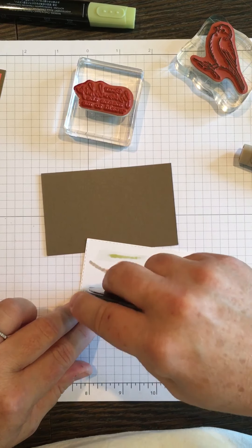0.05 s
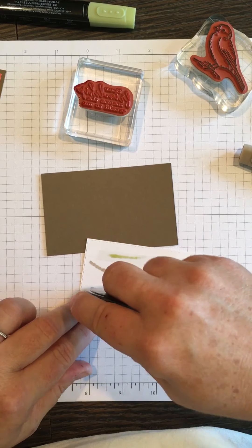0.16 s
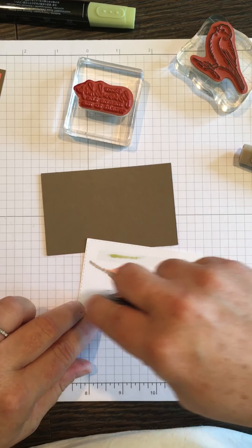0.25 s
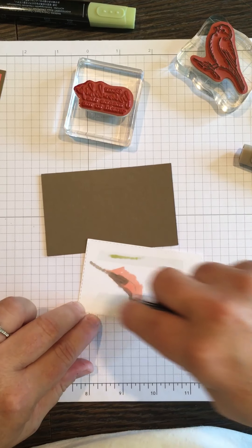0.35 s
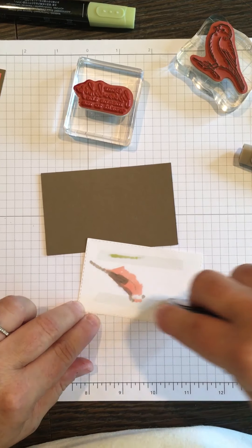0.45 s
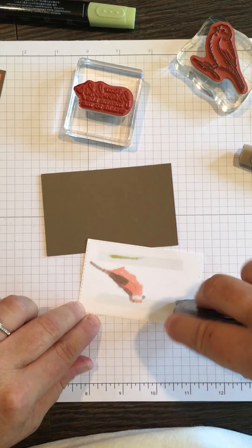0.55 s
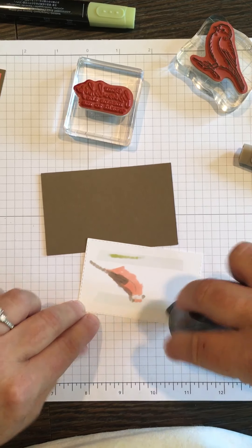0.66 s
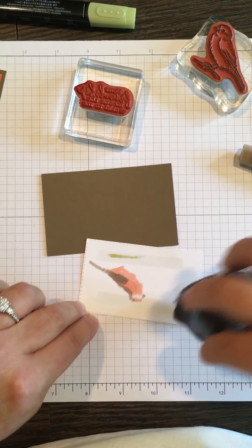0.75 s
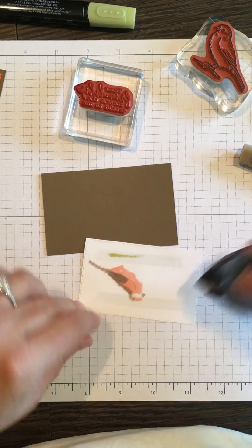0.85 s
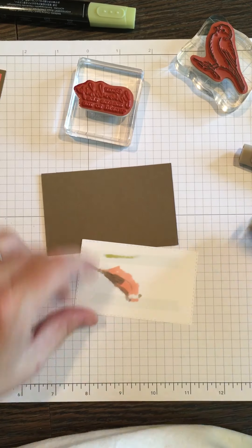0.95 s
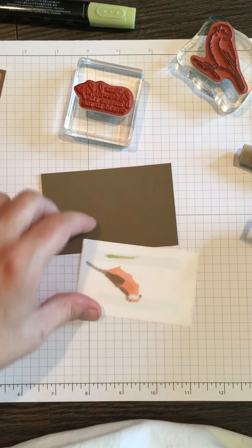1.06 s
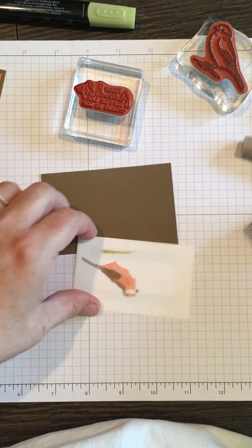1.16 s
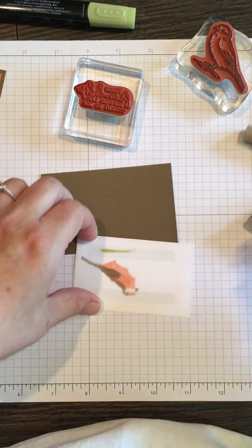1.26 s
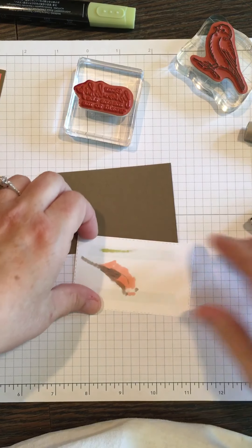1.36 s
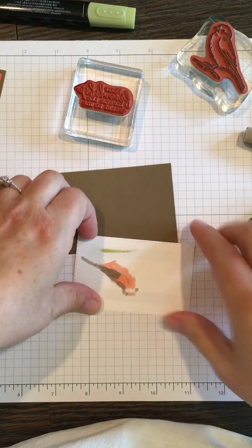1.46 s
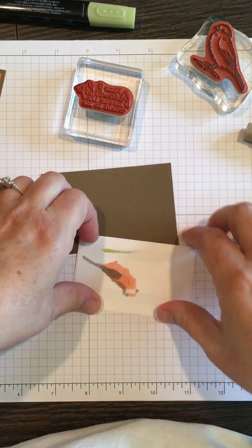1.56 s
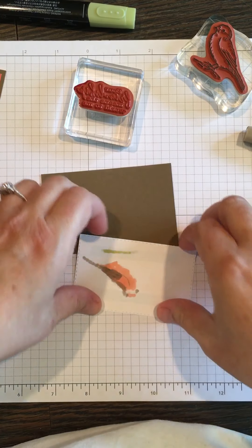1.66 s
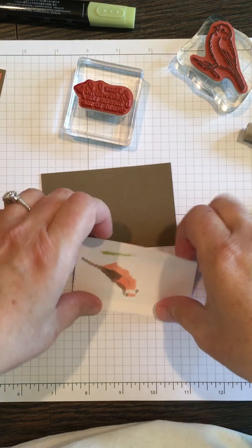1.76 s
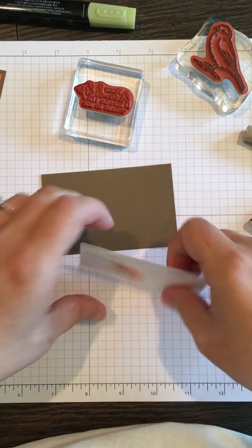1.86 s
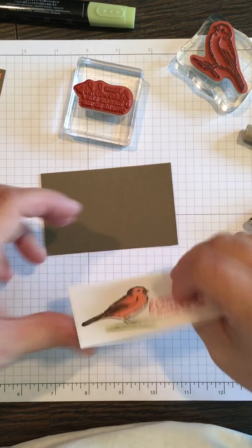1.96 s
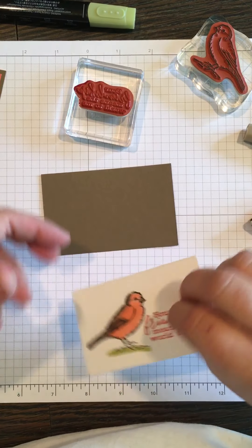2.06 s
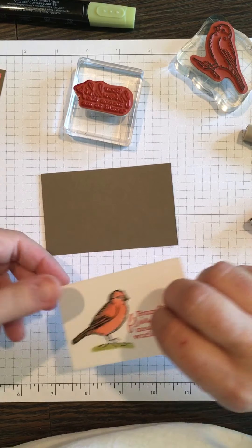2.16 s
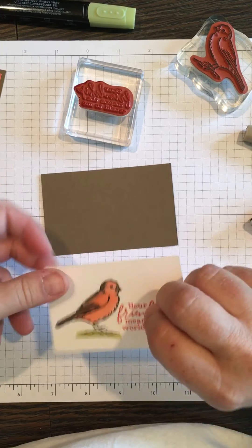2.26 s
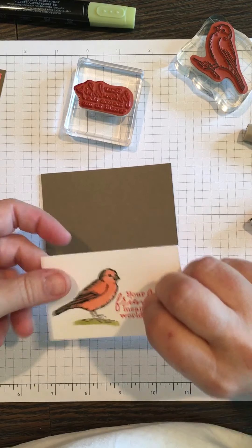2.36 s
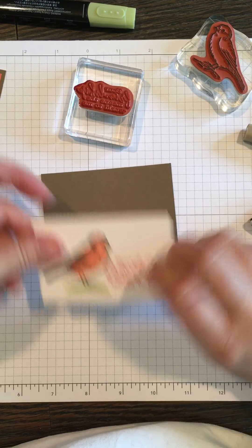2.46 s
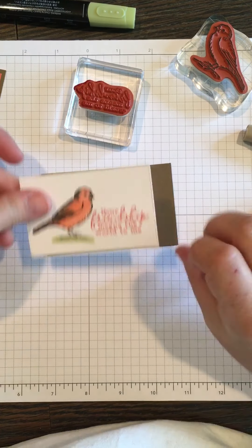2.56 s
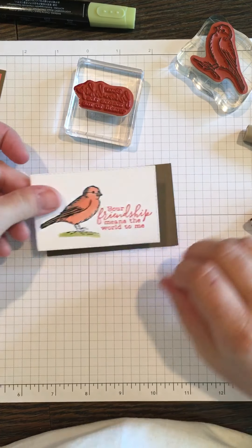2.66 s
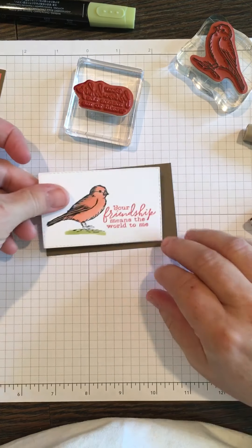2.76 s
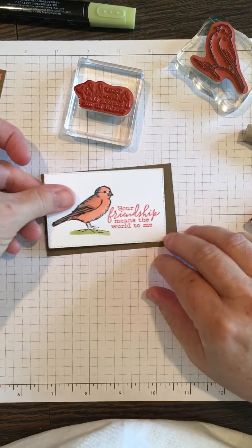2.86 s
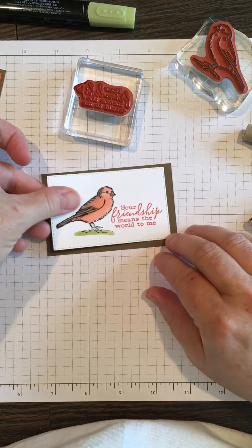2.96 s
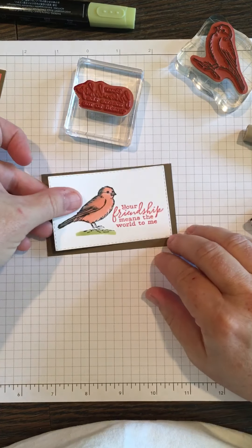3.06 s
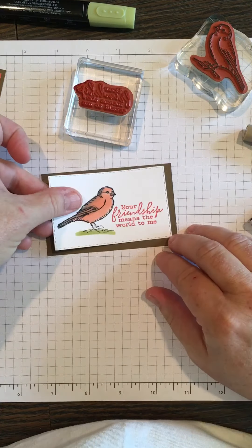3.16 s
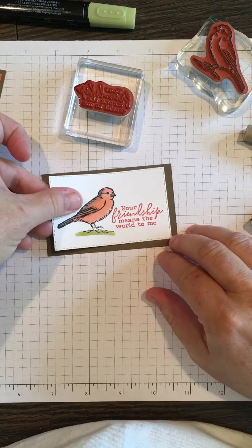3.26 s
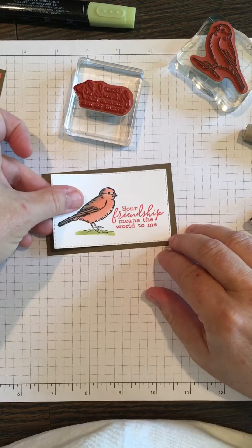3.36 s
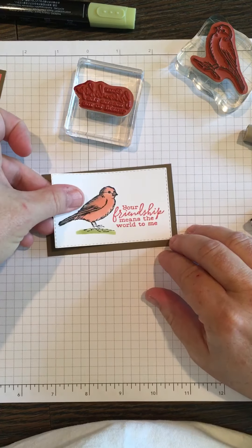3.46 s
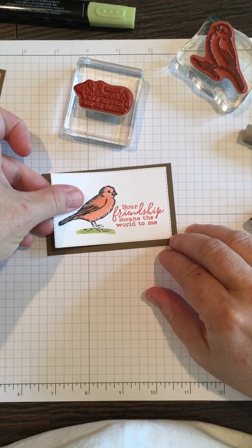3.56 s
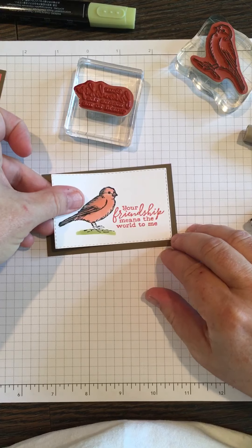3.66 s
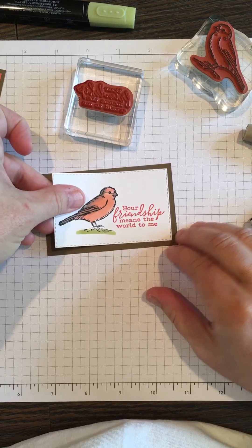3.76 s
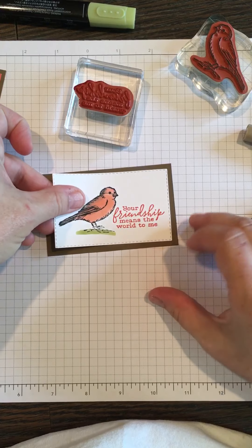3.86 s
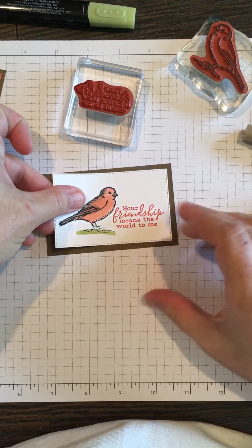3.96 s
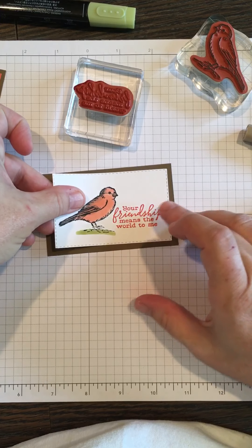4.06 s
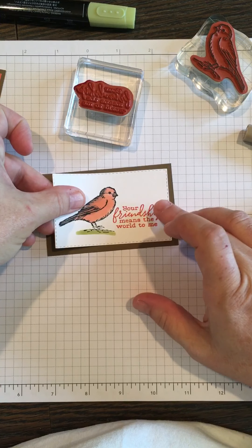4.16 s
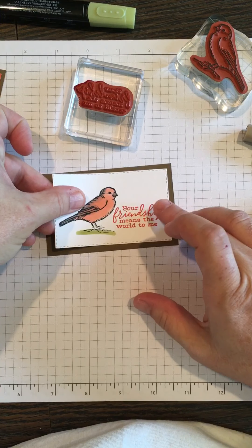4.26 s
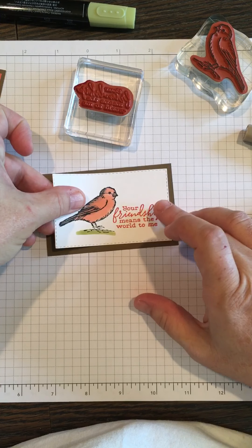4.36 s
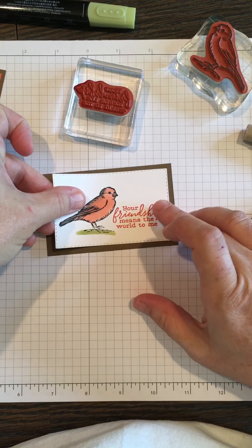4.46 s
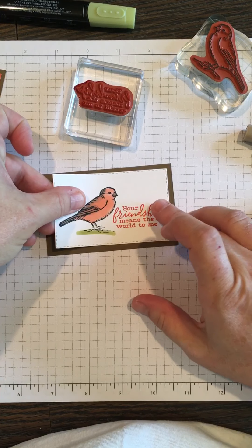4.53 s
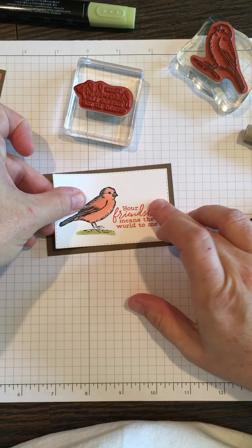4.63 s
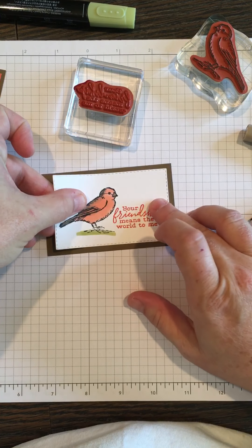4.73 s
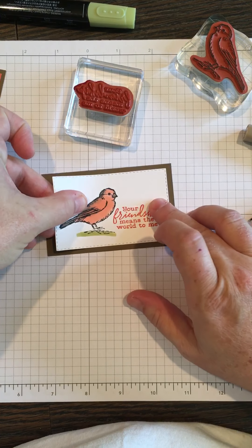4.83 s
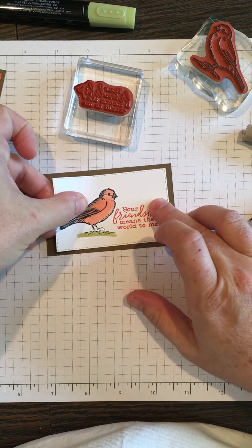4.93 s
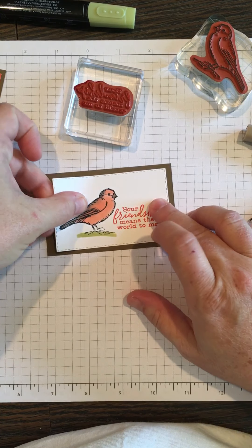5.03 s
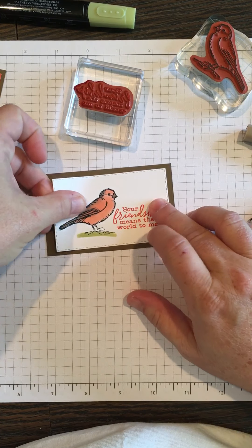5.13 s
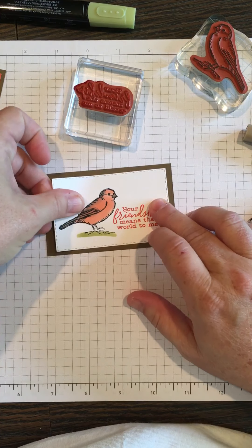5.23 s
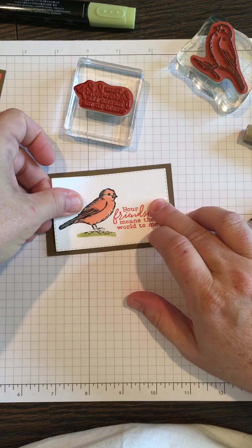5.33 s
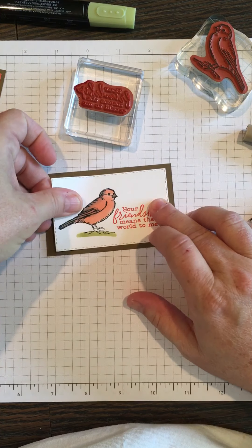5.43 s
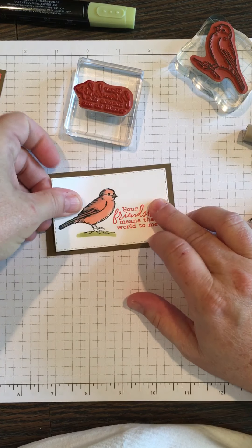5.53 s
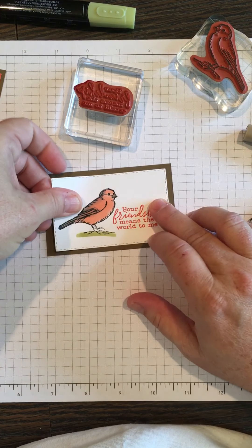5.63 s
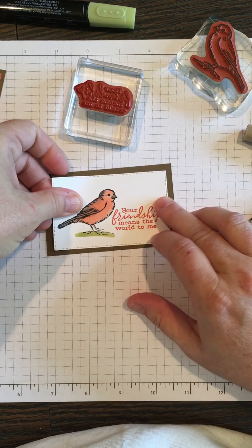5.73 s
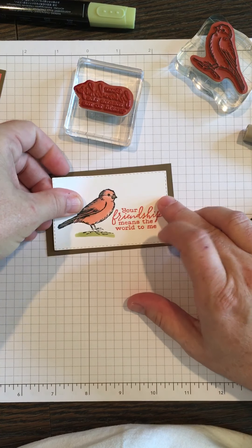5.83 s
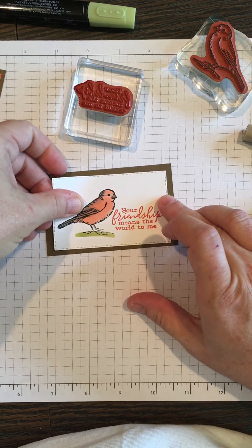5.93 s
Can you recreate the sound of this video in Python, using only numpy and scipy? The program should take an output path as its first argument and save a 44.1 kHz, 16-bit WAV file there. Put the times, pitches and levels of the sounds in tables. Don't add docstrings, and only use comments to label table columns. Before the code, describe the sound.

An adhesive tape runner whirrs briefly across card, is put down with a hard rattle, then paper softly brushes and ticks until near silence.

```python
import sys
import numpy as np
from scipy import signal
from scipy.fft import rfft, irfft, next_fast_len
from scipy.io import wavfile
from scipy.ndimage import uniform_filter1d, map_coordinates

SR = 44100
rng = np.random.default_rng(int(sys.argv[2]) if len(sys.argv) > 2 else 0)


def to_linear_factor(level_db):
    exponent = np.asarray(level_db, float) / 20
    return 10 ** exponent


def store_pcm(level_fs):
    pcm = np.round(np.clip(level_fs, -1, 1) * 32767).astype(np.int16)
    wavfile.write(sys.argv[1], SR, np.atleast_2d(pcm).T)


N = 264159

# [f/Hz, width/Hz, level/dB]
CASE = [(1390, 140, 0), (3130, 290, 1), (4500, 500, -12.5), (6730, 300, -7)]
# [t/s, teeth passed]
TRAVEL = [
    (.3245, 0),
    (.3439, 1),
    (.3582, 2),
    (.4169, 8),
    (.4995, 19),
    (.5405, 24),
    (.5684, 27),
    (.6238, 31),
    (.6363, 32),
]
# [f/Hz, level/dB]
HISS = [(2350, -25), (4000, -13.5), (5000, -11), (6570, -5.5), (7690, -2), (15100, 3), (16100, 2.5),
        (17000, -87.5)]
# [t/s, rubbing level/dB, weight on the table level/dB]
HANDS = [(0, -74.5, -58.5), (.18, -75.5, -52.5), (.29, -71.5, -57.5), (.66, -62.5, -55), (.96, -62, -55),
         (1.1, -67.5, -55.5), (1.18, -54, -45.5), (1.28, -53, -47.5), (1.43, -61.5, -54),
         (1.84, -62, -57.5), (2.18, -69.5, -59.5), (2.5, -65, -59), (2.8, -69, -60), (3.7, -73, -61),
         (4.41, -75.5, -61.5), (4.85, -73, -60), (5.0, -73, -59), (5.99, -70, -61)]


def unit(x):
    return x / np.sqrt(np.mean(x ** 2) + 1e-20)


def along(points, hz):
    f, v = np.transpose(points)
    return np.interp(np.log(hz + 1), np.log(f + 1), v)


def curves(rows):
    s, *cols = np.transpose(rows)
    return [np.interp(np.arange(N) / SR, s, c) for c in cols]


def wobble(rate):
    knots = rng.standard_normal(int(N * rate / SR) + 4)
    return map_coordinates(knots, [np.arange(N) * rate / SR])


def filtered(x, response):
    m = next_fast_len(len(x) + 4096)
    return irfft(rfft(x, m) * response(np.fft.rfftfreq(m, 1 / SR)), m)[:len(x)]


def coloured(x, spectrum):
    return filtered(x, lambda hz: to_linear_factor(along(spectrum, hz)))


def ringing(x, modes):
    def response(f):
        total = 0
        for k, (centre, width, db) in enumerate(modes):
            mode = 1j * f * width / (centre * centre - f * f + 1j * f * width)
            total = total + (-1) ** k * to_linear_factor(db) * mode
        return total
    return filtered(x, response)


def burst(spread_ms):
    u = np.arange(SR // 20) / SR / (max(spread_ms, .2) / 1000)
    return u ** 1.41 * np.exp(-1.4 * u) * rng.standard_normal(len(u))


def add(track, s, sound, db):
    part = track[round(s * SR):][:len(sound)]
    part += to_linear_factor(db) * sound[:len(part)] / np.abs(sound).max()


def grainy(rate, spread_db, bed):
    hit = rng.random(N) < rate / SR
    sparks = hit * rng.standard_normal(N) * to_linear_factor(spread_db * rng.exponential(1, N))
    return unit(sparks) + bed * rng.standard_normal(N)


def ratchet():
    # [f/Hz, level/dB]
    snap = [(2940, -39), (5000, -6), (6660, -17.5), (7650, -14), (10500, -9.5), (12100, -8), (15300, -3),
            (16200, -20.5), (17000, -72)]
    # [t/s, pawl force level/dB, grip that frees the shell's low ring level/dB]
    pull = [
        (.324, -25.5, -18),
        (.346, -29, -4),
        (.37, -25, -8.5),
        (.41, -29.5, -4.5),
        (.453, -35, -10),
        (.495, -30, -10.5),
        (.53, -29.5, -10),
        (.56, -29, -11.5),
        (.626, -27, -13.5),
    ]
    snap_db, last_tooth_db = 5.5, -14.5
    scatter_db, jitter_ms = 2, .5
    out = np.zeros(N)
    when, teeth = np.transpose(TRAVEL)
    chance = rng.standard_normal((int(teeth[-1]) + 1, 4))
    times = np.interp(np.arange(len(chance)), teeth, when) + jitter_ms / 1000 * chance[:, 3]
    force_db, grip_db = curves(pull)
    for s, luck_db in zip(times, scatter_db * chance[:, :3]):
        at = round(s * SR)
        high_db = force_db[at] + last_tooth_db * (s > when[-2:].mean())
        low_ring = ringing(burst(.9), CASE[:1])
        high_rings = ringing(burst(1.5), CASE[1:])
        crack = coloured(burst(1.35), snap)
        levels_db = luck_db + [high_db + grip_db[at], high_db, high_db + snap_db]
        for sound, db in zip([low_ring, high_rings, crack], levels_db):
            loudest = np.sqrt(uniform_filter1d(sound ** 2, size=60).max())
            out[round((s - .0006) * SR):][:len(sound)] += to_linear_factor(db) * sound / loudest
    return out


def peel():
    # [t/s, pull level/dB]
    glue = [
        (.345, -50),
        (.356, -33),
        (.415, -34),
        (.454, -25),
        (.474, -31),
        (.518, -37),
        (.561, -39),
        (.574, -28),
        (.6, -42),
    ]
    # [f/Hz, level/dB]
    threads = [(3000, -28), (8000, -4.5), (11000, -4.5), (15300, -3), (17000, -2.5)]
    # [f/Hz, width/Hz, level/dB]
    table = [(75, 50, 0), (170, 20, -1.5), (297.6, 26, -5), (352, 63, -15.5)]
    breaks_per_tooth, let_go_s = 5.5, .03
    scrape_100_db, scrape_grows = -50, 1.7
    t, start, stop = np.arange(N) / SR, TRAVEL[0][0], TRAVEL[-1][0]
    turning = np.gradient(curves(TRAVEL)[0]) * SR
    speed = np.clip(uniform_filter1d(turning, size=900), 40, None)
    touch_s = [start, start + 0.0061, stop, stop + let_go_s, stop + 2 * let_go_s]
    touch_db = np.interp(t, touch_s, [-39, 0.5, 1.5, -11, -43])

    crackle_db = curves(glue)[0] + 0.59 * wobble(60) + 2 * touch_db
    break_rate = breaks_per_tooth * speed * to_linear_factor(1.2 * wobble(300))
    breaks = np.diff(np.floor(np.cumsum(break_rate) / SR), prepend=0)
    uneven = breaks * to_linear_factor(2.2 * rng.standard_normal(N))
    sparks = ringing(uneven, [(12300, 2200, -5), (15100, 2200, 0)])
    crackle = unit(coloured(unit(sparks) + .4 * rng.standard_normal(N), threads))

    scrape_db = scrape_100_db + scrape_grows * 20 * np.log10(speed / 100) + 1.5 * wobble(40) + touch_db
    scrape = unit(ringing(rng.standard_normal(N), CASE))
    shake = unit(ringing(rng.standard_normal(N), table[2:]))
    return to_linear_factor(crackle_db) * crackle + to_linear_factor(scrape_db) * (scrape + to_linear_factor(-19) * shake)


def taps():
    # [t/s, bright peak level/dB, body level/dB, body f/Hz, table thud level/dB]
    knocks = [(0.1244, -51, -42.5, 1390, -73), (0.2922, -58, -34, 2950, -65),
              (0.8312, -45, -36.5, 2800, -58), (0.8985, -40, -35, 4100, -60),
              (1.1131, -8, -16.5, 4500, -41), (1.118, -32, -24, 1593, -62),
              (1.1878, -14.5, -21, 3760, -36.5), (1.201, -21.5, -29, 1445, -43),
              (1.2402, -4, -27, 2196, -53), (1.251, -39, -29, 1003, -49), (1.278, -23, -16.5, 5000, -43),
              (1.277, -12.5, -13.5, 1810, -41), (1.2912, -43.5, -36, 1327, -37.5),
              (1.3628, -27, -31, 2680, -39), (1.8466, -33, -32.5, 3700, -56),
              (2.0417, -36, -36.5, 620, -48), (2.05, -44, -31, 850, -52), (2.069, -47, -34, 3320, -70),
              (2.3152, -52, -30.5, 3360, -46.5), (2.4447, -35, -33.5, 2020, -39),
              (3.1357, -36, -35, 2720, -54), (4.995, -30.5, -41.5, 2100, -39.5),
              (5.0983, -43, -35.5, 4000, -52), (5.1234, -42, -27, 5900, -49.5)]
    # [t/s, bright peak level/dB, body level/dB, body f/Hz]
    light_ticks = [(.1086, -52, -45.5, 1070), (.1151, -57, -41.5, 2780), (.6608, -36, -49, 3000),
                   (.6786, -35, -58, 3210), (.6971, -40, -60, 2970), (.8547, -38, -61, 1350),
                   (.9123, -44, -40.5, 3950), (1.2956, -34, -35, 1065), (1.3786, -25.5, -39.5, 810),
                   (1.4021, -33, -38.5, 3200), (1.4544, -48, -40, 2460), (1.4877, -58, -35, 2930),
                   (1.5246, -55, -48, 1080), (1.5556, -41, -42, 1090), (1.5695, -60, -40, 3180),
                   (1.7473, -36, -43.5, 3980), (1.778, -43, -51, 1980), (1.8029, -47, -44.5, 1590),
                   (1.8995, -48, -38.5, 1720), (2.0845, -29, -41, 3130), (2.1328, -50, -44, 3600),
                   (2.2288, -38, -45.5, 3750), (2.3413, -40.5, -39, 1000), (2.5096, -42, -45, 3720),
                   (2.5903, -37, -47.5, 2370), (2.7573, -61, -45.5, 2400), (2.8589, -48.5, -43.5, 2980),
                   (3.5045, -44, -48, 3970), (4.916, -56, -51, 2210), (5.5355, -66, -52.5, 2220)]
    # [t/s, level/dB, f/Hz]
    creaks = [(.7135, -47, 3050), (1.1916, -22, 1700), (1.2595, -33, 990), (1.281, -17.5, 2894),
              (1.915, -49, 2600), (2.1196, -52, 4110), (2.458, -48, 3750), (2.574, -46, 5730),
              (2.6406, -54, 1330), (2.9513, -49.5, 2870), (3.035, -49.5, 3400), (3.3734, -62, 1000),
              (3.45, -55, 3880), (3.6894, -63.5, 1310), (5.2756, -59, 697), (5.3239, -61, 900),
              (5.347, -58.5, 4500), (5.4132, -56.5, 700), (5.4566, -53.5, 1800), (5.5617, -53, 2880),
              (5.616, -56, 1030), (5.6784, -58, 2500), (5.7146, -61, 2010), (5.813, -58, 1270),
              (5.903, -54.5, 2800), (5.941, -61, 2500)]
    # [f/Hz, width/Hz, level/dB]
    thud = [(135, 130, -1), (333, 140, 1.5), (572.6, 250, -3.5)]
    knock_ms, tick_ms = 1.28, 1
    blows = [(*row, knock_ms) for row in knocks]
    for s, bright_db, body_db, hz in light_ticks:
        blows.append((s, bright_db, body_db, hz, body_db - 17.5, tick_ms))
    for s, db, hz in creaks:
        blows.append((s, db - 4, db, hz, db - 20, tick_ms))

    out = np.zeros(N)
    for s, bright_db, body_db, hz, thud_db, spread_ms in blows:
        add(out, s, coloured(burst(spread_ms), HISS), bright_db)
        blow = burst(1.2 * spread_ms)
        lasting = ringing(blow, [(hz, .13 * hz, -1)])
        knock = ringing(blow, [(hz, .45 * hz, 0), (2.3 * hz, 2 * hz, -7)])
        add(out, s, lasting + knock, body_db)
        add(out, s, ringing(burst(3.0), thud), thud_db)
    return out


def slide():
    # [t/s, swell/ms, fade/ms, hiss level/dB, body level/dB]
    brushes = [(0.106, 11, 14, -62, -60), (0.816, 14, 21, -58, -61), (.898, 10, 35, -50, -59),
               (1.072, 13, 20, -53, -99), (1.303, 16, 25, -51, -74), (1.36, 41, 24, -56, -51),
               (1.862, 52.4, 28.5, -37, -43.5), (2.037, 39, 14, -40, -45), (2.088, 44, 9.6, -52.5, -65),
               (2.222, 8.9, 35, -56.5, -64), (2.308, 12, 6.4, -54, -53), (2.418, 6.7, 21, -66, -81),
               (2.562, 20, 97, -55, -74), (2.672, 115, 22, -68, -96), (3.084, 15, 6.2, -59.5, -61),
               (3.131, 8.3, 17, -56, -47), (3.402, 57, 24, -69, -69.5), (3.498, 8.2, 36, -65, -68.5),
               (3.8, 136, 13, -72.5, -80.5), (4.03, 69, 61, -68.5, -83), (4.772, 59, 28, -69, -71.5),
               (4.994, 2.5, 54, -46.5, -64), (5.098, 20.7, 26, -45.5, -53), (5.728, 27, 42, -56.5, -74)]
    # [f/Hz, level/dB]
    card_colour = [(290, -47.5), (500, -18.5), (1060, 4), (1410, -2.5), (1670, -2), (1890, -4), (3320, -6),
                   (4870, -11), (6000, -12), (7800, -30), (13200, -120)]
    end_db = -12
    loose_hz = 1800
    ms = np.arange(N) / SR * 1000
    rub_db, weight_db = curves(HANDS)
    hiss = to_linear_factor(rub_db)
    body = to_linear_factor(rub_db - 2 + 0.14 * (weight_db - weight_db.mean()))
    loose = np.zeros(N)
    for start, swell, fade, hiss_db, body_db in brushes:
        steps = start * 1000 + np.cumsum([-4, 4, swell, fade, 12])
        press = to_linear_factor(np.interp(ms, steps, [-40, end_db, 0, end_db, -40], -200, -200))
        hiss = hiss + to_linear_factor(hiss_db) * press
        loose = loose + to_linear_factor(body_db) * press

    rub = grainy(2500, spread_db=.8, bed=1.5) * to_linear_factor(2.2 * wobble(140))
    z = signal.stft(rub, nperseg=256)[2]
    patches = uniform_filter1d(rng.standard_normal(z.shape), size=5, axis=0)
    patches = uniform_filter1d(patches, size=9, axis=1)
    rub = signal.istft(z * to_linear_factor(1.8 * unit(patches)), nperseg=256)[1][:N]
    card = unit(coloured(rub, card_colour))
    free_card = unit(filtered(card, lambda hz: 1 / (1 + (loose_hz / (hz + 1)) ** 4)))
    return hiss * unit(coloured(rub, HISS)) + body * card + loose * free_card


def room(x):
    # [delay/ms, level/dB]
    walls = [(6, -14), (12.5, -21.5), (19, -28), (27, -36.5)]
    # [f/Hz, t60/s]
    decay = [(200, 0.59), (2000, 0.21), (12000, 0.046)]
    hz, t, z = signal.stft(rng.standard_normal(SR // 2), SR, nperseg=256)
    fall_db = -60 * t / along(decay, hz)[:, None]
    tail = signal.istft(z * to_linear_factor(fall_db), SR, nperseg=256)[1]
    answer = to_linear_factor(-16) * np.pad(tail, (500, 0)) / np.linalg.norm(tail)
    for ms, db in walls:
        smear = burst(1.3)
        answer[round(ms * SR / 1000):][:len(smear)] += to_linear_factor(db) * smear / np.linalg.norm(smear)
    return signal.fftconvolve(x, answer)[:N]


def air():
    # [f/Hz, level/dB]
    floor = [(12, -35), (20, -8), (58, 3.5), (106, 0), (197, -4.5), (318, -11.5), (1270, -24), (1590, -41),
             (4770, -34.5), (6690, -28), (7930, -30.5), (14800, -28), (17000, -45.5)]
    # [t/s, length/ms, f/Hz, level/dB]
    hums = [
        (0, 300, 88, -57),
        (2.33, 420, 1390, -75),
        (2.55, 110, 281, -67),
        (3.15, 120, 170, -62),
        (4.81, 180, 172, -59),
        (5.0, 170, 285, -64),
        (5.7, 320, 126, -62),
    ]
    t = np.arange(N) / SR
    noise = unit(coloured(rng.standard_normal(N), floor))
    low = filtered(noise, lambda hz: 1 / (1 + (hz / 450) ** 4))
    out = to_linear_factor(-66) * (noise - low) + to_linear_factor(curves(HANDS)[1] - 2.5) * unit(low)
    for start, length_ms, hz, db in hums:
        to_edge = np.minimum(t - start, start + length_ms / 1000 - t)
        swell = np.clip(to_edge / 0.0043, 0, 1)
        level = to_linear_factor(db + 0.34 * wobble(54)) * swell
        out += level * np.sin(2 * np.pi * hz * t + 0.59 * wobble(4.9))
    return out


def scene():
    hits = ratchet() + peel() + taps()
    return (hits + room(hits) + slide() + air())[None]


def band_limit(x):
    return signal.sosfilt(signal.butter(12, 17140, fs=SR, output="sos"), x)


def record(dry):
    # [f/Hz, width/Hz, depth 0-1]
    dips = [(5000, 480, 0.4), (7660, 700, 0.4), (10520, 780, 0.36)]
    top_hz = 15850

    def microphone(hz):
        notches = np.prod([1 - depth * np.exp(-((hz - c) / w) ** 2) for c, w, depth in dips], axis=0)
        top = to_linear_factor(np.interp(hz, [top_hz - 180, top_hz + 60], [0, -30]))
        low_cut = np.sqrt(1 + (38 / (hz + 1)) ** 6)
        return notches * top / low_cut

    return band_limit(filtered(dry[0], microphone)[None])


dry = scene()
out = record(dry)
store_pcm(out)
```